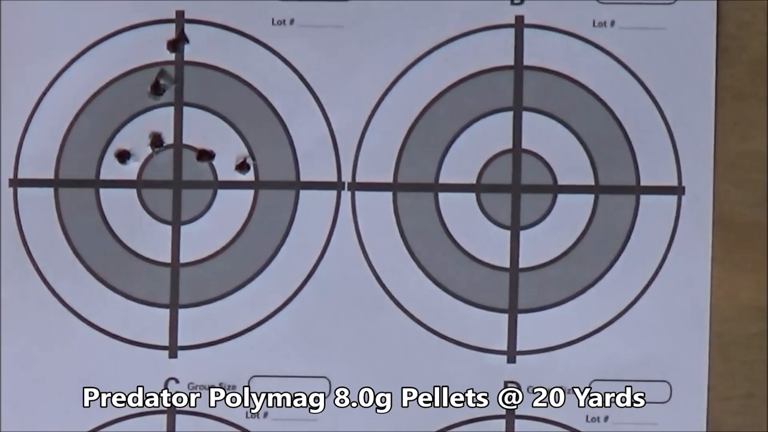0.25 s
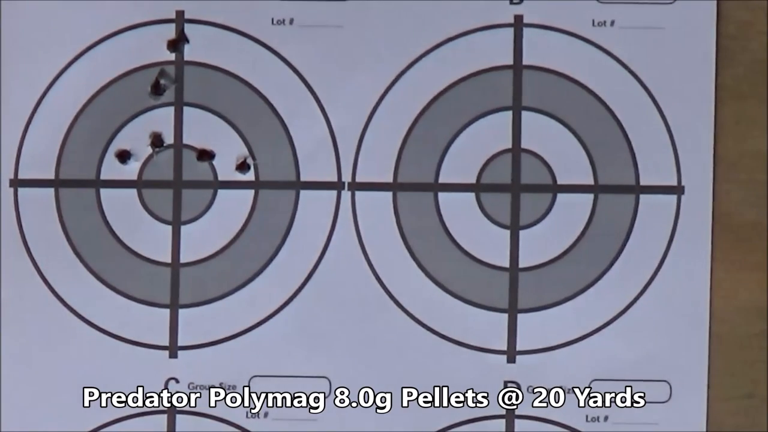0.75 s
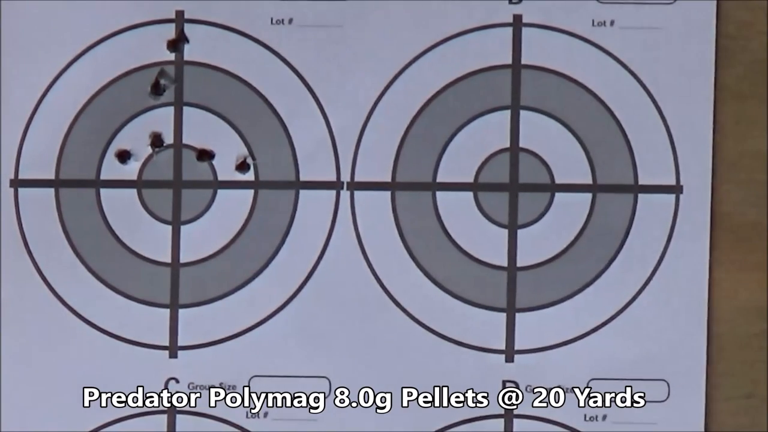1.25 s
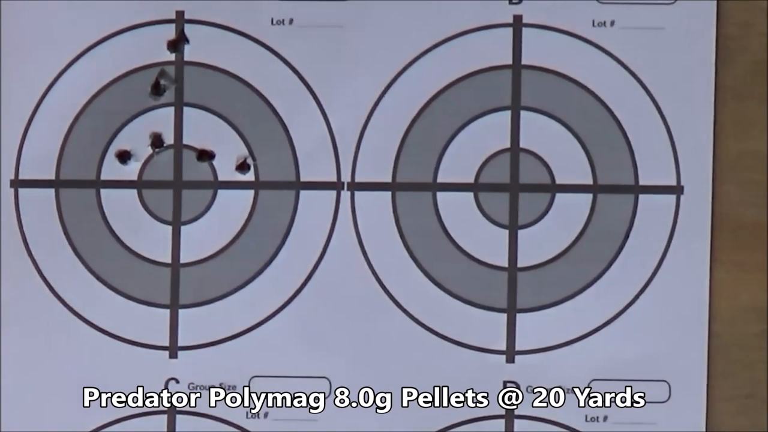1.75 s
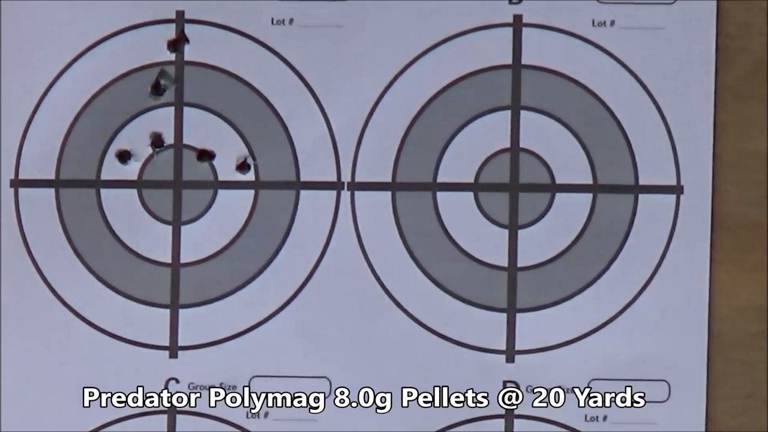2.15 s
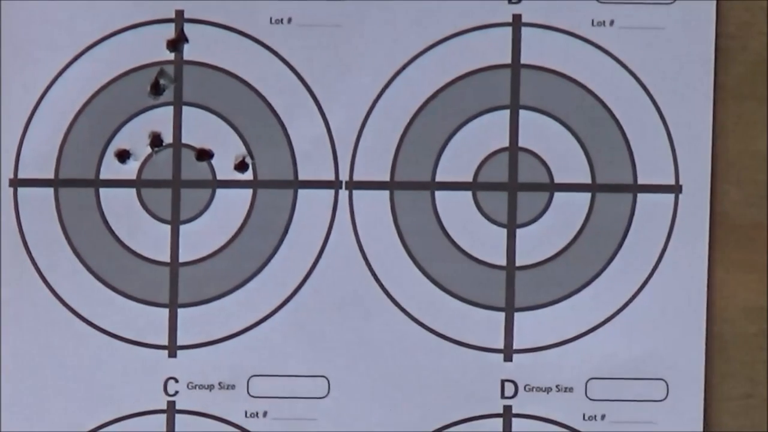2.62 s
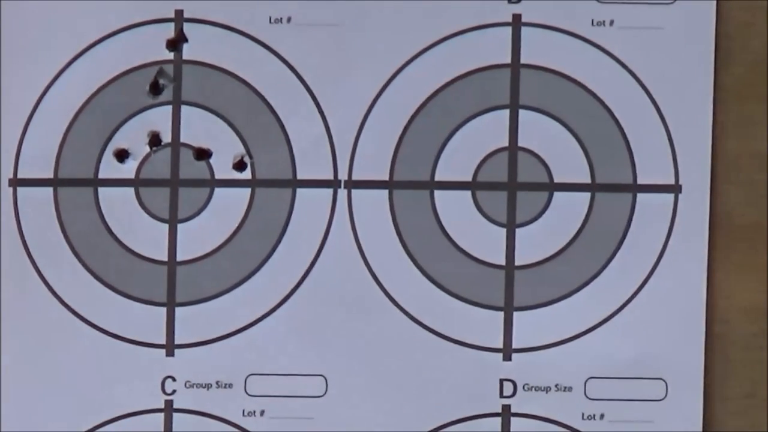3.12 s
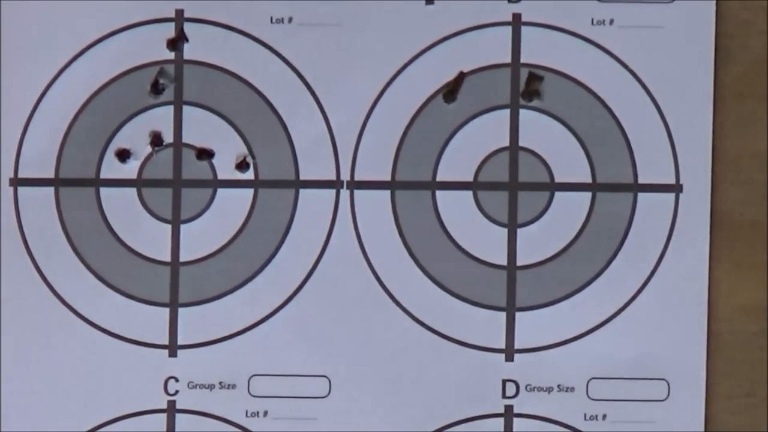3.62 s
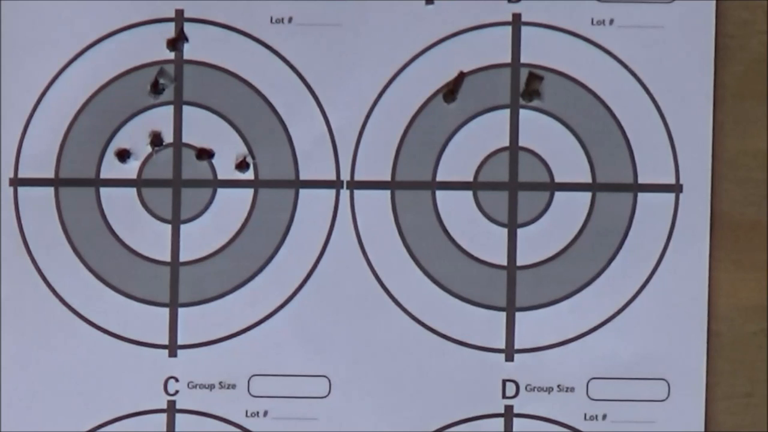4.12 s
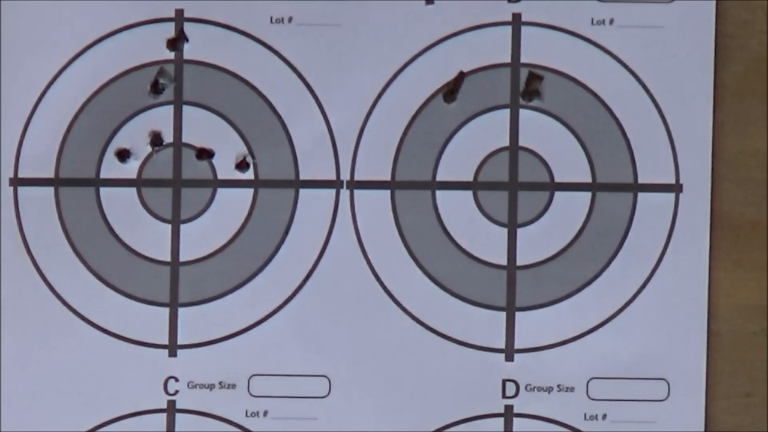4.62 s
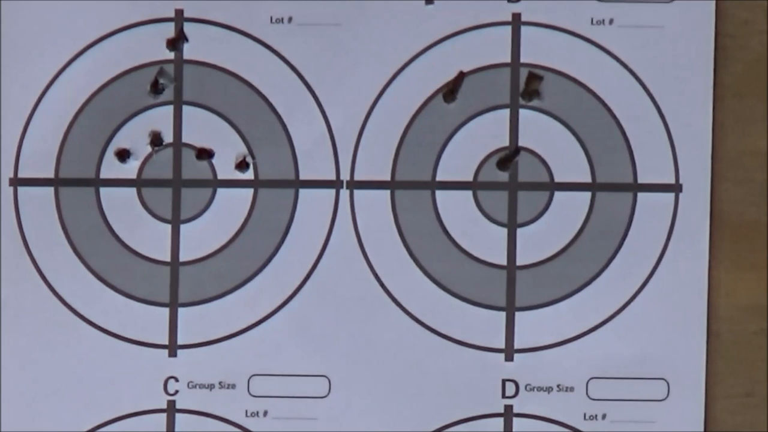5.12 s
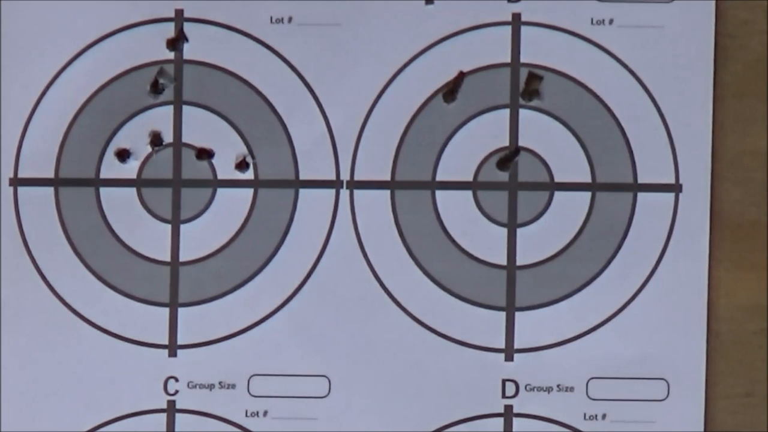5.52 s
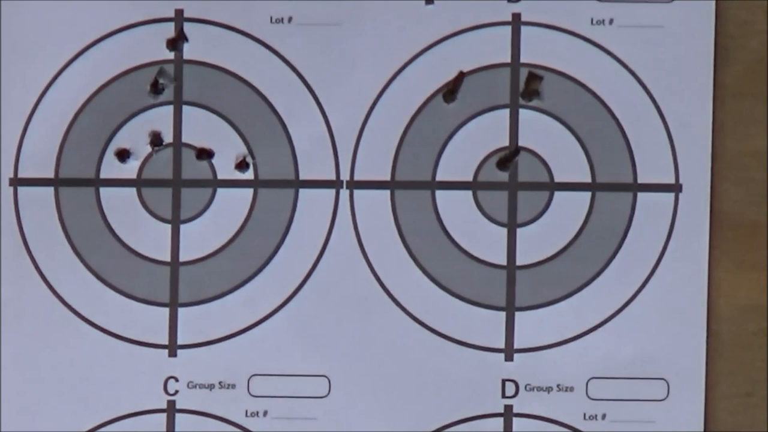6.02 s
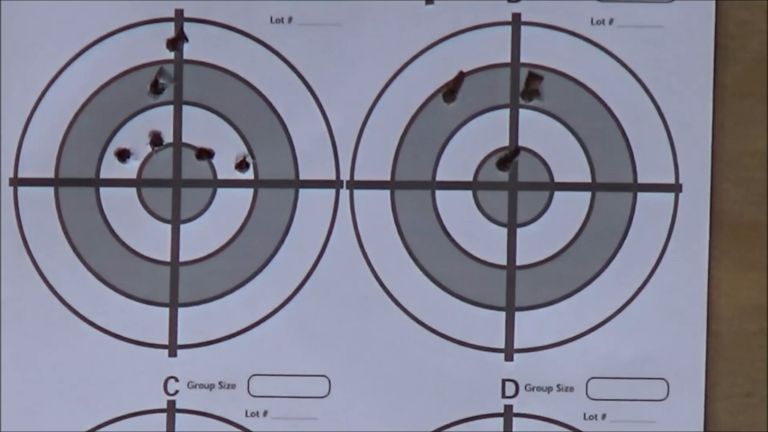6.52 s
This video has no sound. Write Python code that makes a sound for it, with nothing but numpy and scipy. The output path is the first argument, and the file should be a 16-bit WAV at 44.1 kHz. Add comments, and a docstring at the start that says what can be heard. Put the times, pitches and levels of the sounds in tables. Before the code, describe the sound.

Outdoors at a shooting range, wind buffets a stereo microphone with low rumble, roar and leaf hiss for about three seconds. A hard cut drops to quiet air with distant rumble. After a pause, an air rifle fires one dry crack with a very quick pellet strike, knocks, little ticks and a brief echo, then a calm, slightly quieter background remains.

```python
"""Air rifle on a windy range

Wind rushes through leaves and over a stereo microphone (bands of wavering noise); a cut leads to a calm moment.
A spring air rifle fires: piston hiss, muzzle crack and pellet strike are noise bursts; rings, knocks, echoes follow.
The recorder limits loud peaks just ahead of time and turns its gain down for seconds after the shot."""
import sys
import numpy as np
from scipy import signal
from scipy.fft import rfft, irfft, next_fast_len
from scipy.io import wavfile
from scipy.ndimage import uniform_filter1d, minimum_filter1d

SR = 44100
rng = np.random.default_rng(int(sys.argv[2]) if len(sys.argv) > 2 else 0)


def to_wav(sig):
    """Store sig (one row per channel, or 1-D mono) as 16-bit WAV at the path in sys.argv[1].

    Samples outside -1..1 are clipped; the rate is SR.
    """
    pcm = np.clip(np.atleast_2d(sig), -1, 1) * 32767
    pcm = np.round(pcm).astype(np.int16)
    wavfile.write(sys.argv[1], SR, pcm.T)  # frames by channels


N = 298102  # length in samples

# Bursts of air: piston (low and high hiss), muzzle, pellet strike. The level is the jet's ceiling before panning:
# t/s, level/dB, rise/s, hold/s, time to fall 60 dB/s, lowest f/Hz, highest f/Hz, left over right/dB, unlike share
AIR_BURSTS = [(4.7605, -28, .004, .002, .03, 1200, 3000, 4, .5),
              (4.7615, -35, .0015, .003, .012, 5500, 9800, .5, .3),
              (4.7694, -3, .0005, .0003, .004, 900, 13000, 3, .5),
              (4.841, 2, .0001, .0006, .0025, 3800, 11500, -.5, .08)]
# Fuzzy rings of barrel, spring and tube: t/s, length/s, f/Hz, level/dB
FUZZY_RINGS = [(4.772, 0.077, 9750, -31), (4.812, .02, 5970, -23.5), (4.77, 0.021, 7200, -39),
               (4.772, 0.066, 1845, -35), (4.927, .04, 4350, -36), (4.93, 0.093, 1700, -45.5),
               (5.14, 0.043, 1765, -49)]
# Dull knocks within the shot: t/s, level before the fade/dB, f/Hz, time to fall 60 dB/s
DULL_KNOCKS = [(4.786, -25, 440, .05), (4.809, -15, 280, 0.021), (4.852, -23, 268, .04),
               (4.874, -25, 261, 0.045), (4.8898, -12, 683, 0.0084)]
# Bouncing scraps: t/s, base level/dB, base f/Hz, brightness/(dB per octave)
SCRAP_TICKS = [(5.025, -29, 3000, 0.1), (5.068, -24, 2900, 3), (5.1, -18.5, 3150, -8.5),
               (5.109, -43, 2500, 20), (5.123, -31, 3100, 0.1), (5.179, -23, 2750, -1)]
# Ringing modes of a scrap: pitch ratio to the base, level added/dB, time to fall 60 dB/s
SCRAP_MODES = [(.57, -14.5, .01), (1, 2, .003), (3.15, -20, .003)]
# Waves of echo: peak t/s, base level/dB, treble over bass/dB, base time to fall 60 dB/s
ECHO_WAVES = [(4.772, -28, -4, .08), (4.789, -30, -0.5, 0.32), (4.823, -27.5, 6, 0.23),
              (4.856, -34, 2, 0.14), (4.874, -31.5, 8, 0.68), (4.897, -38.5, -9, 0.13)]
# Echo bands thump, body, sizzle, top: level added/dB, share of the treble lean, factor on the fall time
ECHO_BANDS = [(-4.5, -0.6, 0.75), (-3.5, -0.32, 1.76), (-5.5, 0.58, 1.09), (1.5, 0.088, 0.45)]
# Colour of the echoes within each band: f/Hz, relative level per Hz/dB
ECHO_COLOUR = [(130, -50), (190, -13), (225, -4.5), (290, -4), (464, -12), (512, -15), (600, -12.5),
               (1140, -13.5), (1890, -10.5), (2530, -13.5), (3260, -12), (4200, -10.5), (5960, -4),
               (8150, -7.5), (9900, -4), (15800, -16)]
# How alike left and right are in the echoes: f/Hz, likeness (0 to 1)
ECHO_LIKENESS = [(150, .98), (380, 0.87), (950, .62), (2400, 0.29), (6000, 0.55), (9500, 0.85), (11300, 1)]
# Strength of the wind: t/s, level/dB
WIND_STRENGTH = [(0, -2), (.5, -1.4), (1.1, -.3), (1.35, 1.5), (1.95, 0.5), (2.2, 0), (2.9, -.5), (3.1, 0),
                 (3.3, -1)]
# Wind rumble, roar and leaf hiss: base level/dB, dB gained per dB of wind strength, chance waver/dB
WIND_PARTS = [(-46.5, 1, 1.6), (-41, 0.34, 0.36), (-39, 0.66, 0.3)]
# Colour of the wind within each band: f/Hz, relative level per Hz/dB
WIND_COLOUR = [(18, -41), (30, -7), (81, 4.5), (103, 5.5), (294, -3), (362, 0), (435, -2), (735, -1),
               (2460, -12.5), (5990, -9), (7990, -13.5), (10100, -13.5), (14600, -27), (15800, -35)]
# Distant rumble in the calm: t/s, level/dB
CALM_RUMBLE = [(3.23, -50), (3.55, -53.5), (3.9, -54), (4.3, -50), (4.8, -50), (5.7, -51), (6.76, -50)]
# Colour of the calm air within each band: f/Hz, relative level per Hz/dB
CALM_COLOUR = [(18, -41), (30, -12.5), (95, 2.5), (156, -4), (209, -9.5), (382, -16), (551, -15.5),
               (1030, -18), (1120, -20), (1420, -23), (1840, -27), (5680, -26), (9860, -32.5), (15800, -43)]
# How alike left and right are in the wind and the calm air: f/Hz, likeness (0 to 1)
AIR_LIKENESS = [(60, 1), (130, 1), (290, 0.97), (640, 0.89), (1400, 0.59), (3100, 0.68), (6800, 0.66),
                (9500, 0.66), (11300, 1)]
# Phase by which left leads right in all the rushing noise: f/Hz, lead/radians
LEFT_LEAD = [(100, -0.045), (1000, -0.23), (5000, -.1), (8000, -0.27), (9500, 0.18)]
# Left minus right in all the rushing noise: f/Hz, level/dB
LEFT_LEAN = [(100, 0.6), (300, 0), (800, -1.1), (2500, -1), (5000, 0.7), (10000, 0)]
# Faint airy swells far away: t/s, length/s, level of each band/dB
AIRY_SWELLS = [(3.461, .14, -61.5), (4.239, 0.22, -62.5)]
# Bands of each airy swell: middle f/Hz, width/Hz
SWELL_BANDS = [(1260, 80), (1430, 70)]
# A far hum swells by: t/s, length/s, first f/Hz, last f/Hz, level/dB
FAR_HUM = (4.24, .54, 156, 165, -50)

CUT_S = 3.232  # the windy scene ends here
RUMBLE_GROWS_DB_PER_S = 0.34
MURMUR_DB, LEAVES_DB = -54, -58.5  # steady murmur of air and leaf hiss in the calm
WAVE_RISE_S = 0.018  # each echo wave is 10 dB lower this long before its peak
RING_WIDTH_HZ = 530
TICK_PAN_DB = 6
TOP_EDGE_HZ = 15700


def bursts():
    """Jets of turbulent air with flattened shock peaks: quick rise, short hold, fast decay."""
    out, t = np.zeros((2, N)), np.arange(2000) / SR
    for start, db, rise, hold, t60, low_hz, high_hz, pan_db, unlike in AIR_BURSTS:
        both, left, right = rng.standard_normal((3, len(t)))
        noise = both + unlike * np.array([left, right])
        band = signal.butter(N=4, Wn=[low_hz, high_hz], btype="band", fs=SR, output="sos")
        jet = np.tanh(0.52 * evened(signal.sosfilt(band, noise)))
        fade_db = -60 * np.maximum(t - rise - hold, 0) / t60
        add(out, start, jet * np.clip(t / rise, 0, 1) * gain_of(db + fade_db), pan_db)
    return out


def whistles():
    """Barrel, spring and tube ring fuzzily, as narrow noise around each pitch."""
    return narrow([(start, length, hz, RING_WIDTH_HZ, db) for start, length, hz, db in FUZZY_RINGS], 0.5)


def knocks():
    """Dull knocks sound in the middle, each one fading tone."""
    out = np.zeros((2, N))
    for start, db, hz, t60 in DULL_KNOCKS:
        add(out, start, ring(db, hz, t60), 0)
    return out


def ticks():
    """Bouncing scraps ring their modes a little to the left."""
    out = np.zeros((2, N))
    for start, db, hz, bright in SCRAP_TICKS:
        for ratio, mode_db, t60 in SCRAP_MODES:
            level_db = db + mode_db + bright * np.log2(ratio)
            add(out, start, ring(level_db, hz * ratio, t60), TICK_PAN_DB)
    return out


def echoes():
    """Each wave swells quickly, then dies band by band; powers add, and none comes before the muzzle crack."""
    out, t = np.zeros((2, N)), np.arange(4.77, 5.6, 0.001)
    peak, db, lean, t60 = np.transpose(ECHO_WAVES)[..., None]  # one row of times for each wave
    early, late = np.minimum(t - peak, 0), np.maximum(t - peak, 0)
    swell_db = -10 * (early / WAVE_RISE_S) ** 2
    levels = []
    for band_db, share, factor in ECHO_BANDS:
        wave_db = db + band_db + share * lean + swell_db - 60 * late / (t60 * factor)
        levels.append(10 * np.log10((gain_of(wave_db) ** 2).sum(0)))
    sound = rush(t, levels, (2.1, 1.6, 1.3, 1.8), ECHO_COLOUR, ECHO_LIKENESS, (900, 3600, 7500), waver_hz=150)
    add(out, t[0], sound, 0.8)
    return out


def wind():
    """Gusts drive rumble, roar and leaf hiss by different amounts; the noise stops at the cut."""
    out = np.zeros((2, N))
    t, strength = np.transpose(WIND_STRENGTH)
    levels = [db + follow * strength for db, follow, _ in WIND_PARTS]
    levels[0] = levels[0] + RUMBLE_GROWS_DB_PER_S * t
    wavers_db = [waver_db for _, _, waver_db in WIND_PARTS]
    add(out, t[0], rush(t, levels, wavers_db, WIND_COLOUR, AIR_LIKENESS, (250, 2000), waver_hz=7.3), 0)
    return out * np.clip((CUT_S - np.arange(N) / SR) / 0.0018, 0, 1)  # a 1.8 ms fade at the cut


def calm_air():
    """Distant rumble with a steady murmur of air and leaf hiss, all made of noise."""
    out = np.zeros((2, N))
    t, rumble_db = np.transpose(CALM_RUMBLE)
    levels = [rumble_db, MURMUR_DB + 0 * t, LEAVES_DB + 0 * t]
    add(out, t[0], rush(t, levels, (0.6, 0.15, 0.15), CALM_COLOUR, AIR_LIKENESS, (230, 1700), waver_hz=8.5), 0)
    return out


def airy_swells():
    """Faint airy swells far away, each made of narrow bands of noise."""
    rows = [(start, length, hz, width, db)
            for start, length, db in AIRY_SWELLS for hz, width in SWELL_BANDS]
    return narrow(rows, 0)


def hum():
    """A far hum, one pure tone, swells by and rises a little in pitch."""
    out = np.zeros((2, N))
    start, length, first_hz, last_hz, db = FAR_HUM
    hz = np.linspace(first_hz, last_hz, round(length * SR))
    tone = np.sqrt(2) * np.sin(2 * np.pi * np.cumsum(hz) / SR)
    add(out, start, gain_of(db) * tone * signal.windows.tukey(len(hz), 0.4), 0)
    return out


def rush(times, levels, wavers_db, colour, likeness, edges_hz, waver_hz):
    """Coloured stereo noise split in bands; each follows its own level and wavers by chance."""
    t = np.arange(times[0], times[-1], 1 / SR)
    size = next_fast_len(len(t))
    hz = np.fft.rfftfreq(size, 1 / SR)
    shared, separate = rfft(rng.standard_normal((2, size)))
    like = np.clip(read(likeness, hz), 0, 1 - 1 / 200)
    lean = gain_of(read(LEFT_LEAN, hz) / 2)
    right = like * shared * np.exp(-1j * read(LEFT_LEAD, hz)) + np.sqrt(1 - like ** 2) * separate
    spectrum = np.array([shared * lean, right / lean]) * gain_of(read(colour, hz))
    # share of power below each edge; the steps between neighbours are the bands
    below = [0 * hz] + [1 / (1 + (hz / edge) ** 6) for edge in edges_hz] + [1 + 0 * hz]
    out = 0
    for level_db, waver_db, power in zip(levels, wavers_db, np.diff(below, axis=0)):
        band = irfft(spectrum * np.sqrt(np.clip(power, 0, 1)), size)[:, :len(t)]
        slow_noise = irfft(rfft(rng.standard_normal(size)) / (1 + (hz / waver_hz) ** 2), size)
        waver = evened(slow_noise)[:len(t)]
        gain = gain_of(np.interp(t, times, level_db) + waver_db * waver)
        out = out + band / np.std(band.mean(0)) * gain  # the level is that of left and right averaged
    return out


def narrow(rows, pan_db):
    """Slow noise shifted up to a pitch makes narrow noise, which swells and fades."""
    out = np.zeros((2, N))
    for start, length, hz, width, db in rows:
        t = np.arange(0, length, 1 / SR)
        real, imaginary = rng.standard_normal((2, 3, SR // 2))
        low_pass = signal.butter(N=2, Wn=width / 2, fs=SR, output="sos")
        slow = signal.sosfilt(low_pass, real + 1j * imaginary)[:, -len(t):]  # the settled end
        stereo = slow[0] + 0.32 * slow[1:]  # one shared noise and a little of each side's own
        sound = evened((stereo * np.exp(2j * np.pi * hz * t)).real)
        add(out, start, gain_of(db) * sound * signal.windows.tukey(len(t), 0.5), pan_db)
    return out


def ring(db, hz, t60):
    """A short fading tone with a soft start of about one cycle."""
    t = np.arange(3000) / SR
    soft_start = 1 - np.exp(-1.5 * t * hz)
    return soft_start * gain_of(db - 60 * t / t60) * np.sin(2 * np.pi * hz * t)


def gain_of(db):
    """Turn dB into a factor on the sound wave."""
    return 10 ** (np.asarray(db) / 20)


def evened(x):
    """Scale a sound to an average (RMS) strength of 1."""
    return x / np.sqrt(np.mean(x ** 2) + 1e-20)


def read(points, hz):
    """Read a table between its points, on a logarithmic pitch scale as in hearing."""
    f, value = np.transpose(points)
    return np.interp(np.log(hz + 1), np.log(f + 1), value)


def add(mix, start, sound, pan_db):
    """Add a sound from a start time in s, with left louder than right by pan_db."""
    part = mix[:, round(start * SR):][:, :sound.shape[-1]]
    part += (gain_of([[pan_db / 2], [-pan_db / 2]]) * sound)[:, :part.shape[1]]


def scene():
    """Sum the shot, the air around it and the far sounds."""
    shot = bursts() + whistles() + knocks() + ticks() + echoes()
    return shot + wind() + calm_air() + airy_swells() + hum()


def excess(level_db, limit_db, recover_db):
    """dB above a limit: follows rises at once and falls no faster than recover_db a second."""
    fall = np.arange(N) * recover_db / SR
    held_db = np.maximum.accumulate(level_db + fall) - fall
    return np.maximum(held_db - limit_db, 0)


def record(dry):
    """Microphone port resonance, slow gain control, a look-ahead peak limiter, then the band limit."""
    power_db = 10 * np.log10(abs(uniform_filter1d((dry ** 2).mean(0), size=3000)) + 1e-12)
    smooth = np.exp(-1 / (0.06 * SR))  # the gain takes a moment (60 ms) to come down
    down_db = signal.lfilter([1 - smooth], [1, -smooth], excess(power_db, limit_db=-30.0, recover_db=2.0))
    port = signal.lfilter(*signal.iirpeak(9800, 9, fs=SR), dry)  # the microphone port resonates
    ridden = (dry + 0.21 * port) / gain_of(0.72 * down_db)

    peak_db = 20 * np.log10(abs(ridden).max(0) + 1e-9)
    ahead = 110  # samples of look-ahead
    coming_db = -minimum_filter1d(-np.roll(peak_db, -ahead // 2), size=ahead + 1)  # loudest peak just ahead
    over_db = uniform_filter1d(excess(coming_db, limit_db=-12.5, recover_db=550), size=15)
    limited = ridden / gain_of(over_db)

    low_pass = signal.firwin(1023, TOP_EDGE_HZ, window=("kaiser", 9), fs=SR)
    return signal.oaconvolve(limited, low_pass[None], "same")


dry = scene()
out = record(dry)
to_wav(out)
```